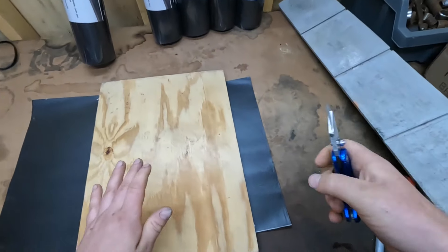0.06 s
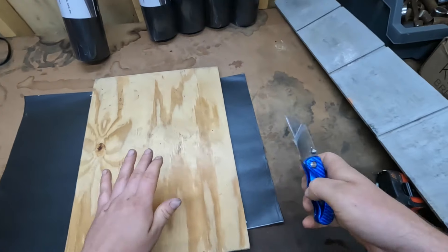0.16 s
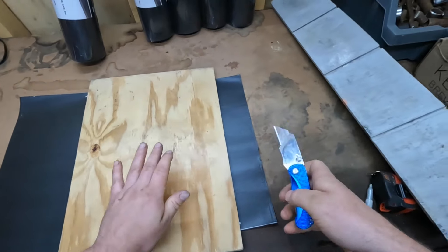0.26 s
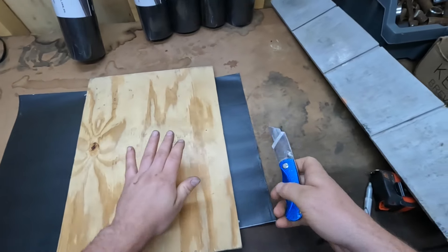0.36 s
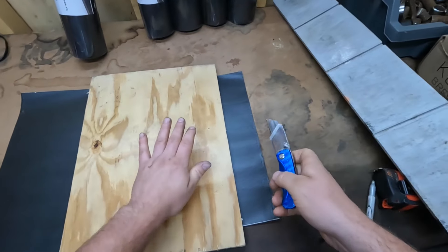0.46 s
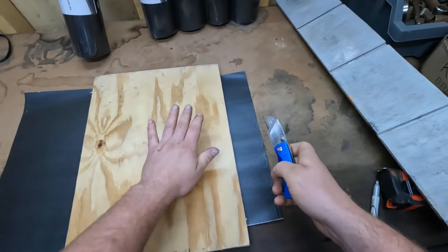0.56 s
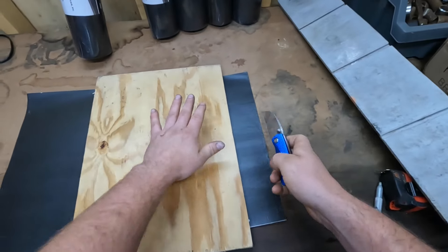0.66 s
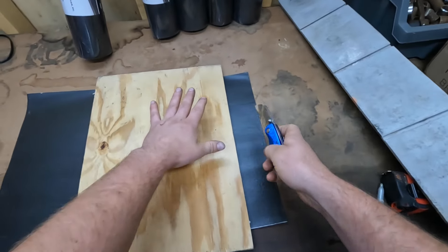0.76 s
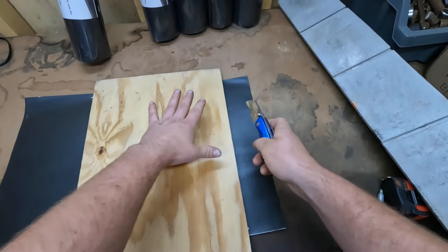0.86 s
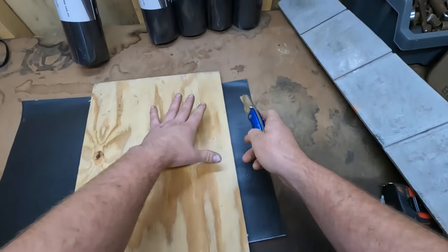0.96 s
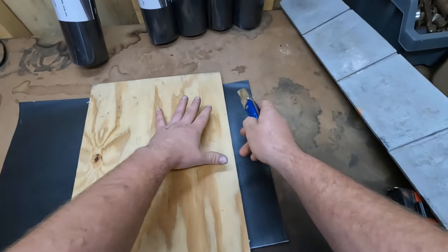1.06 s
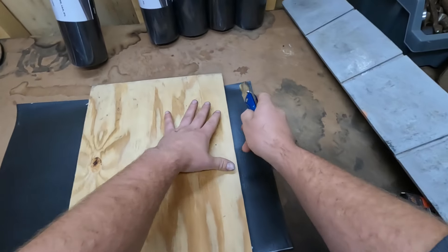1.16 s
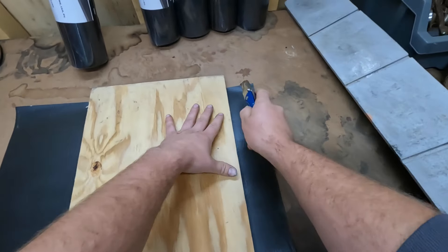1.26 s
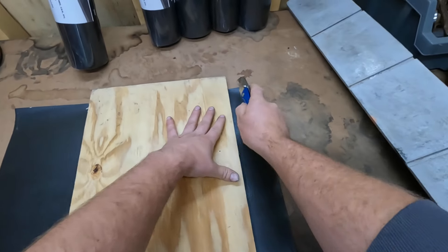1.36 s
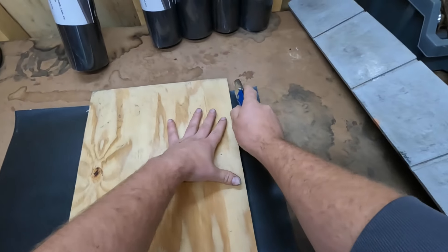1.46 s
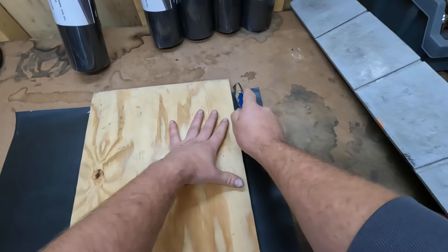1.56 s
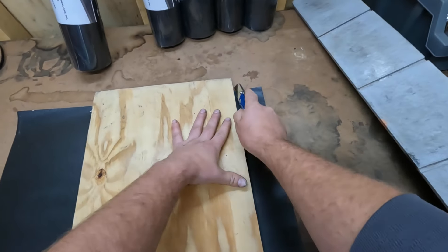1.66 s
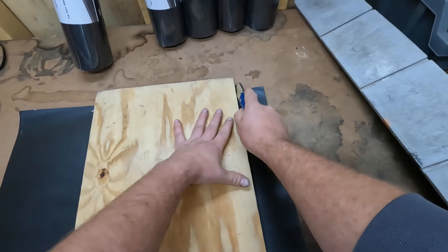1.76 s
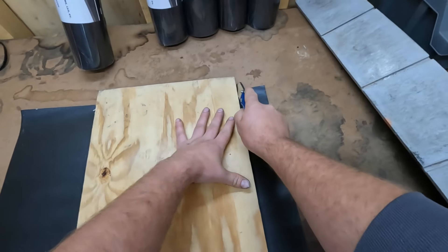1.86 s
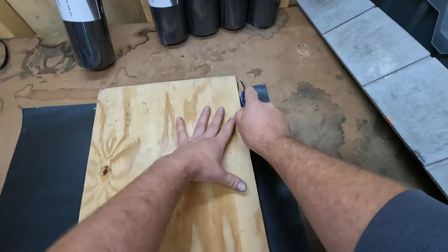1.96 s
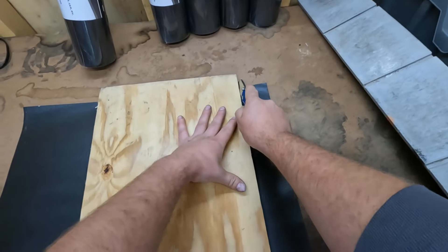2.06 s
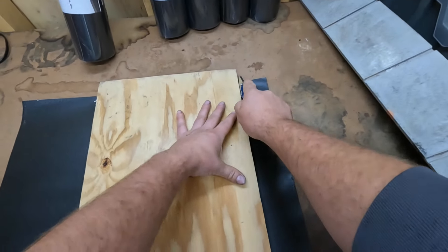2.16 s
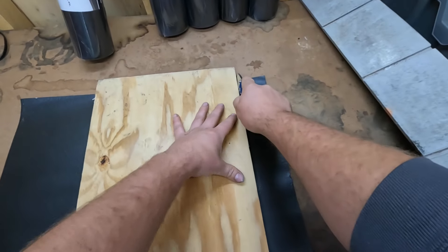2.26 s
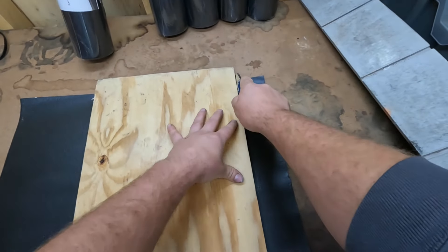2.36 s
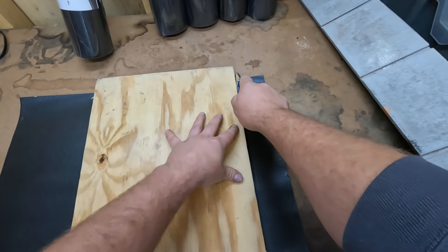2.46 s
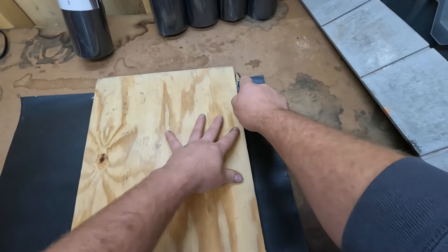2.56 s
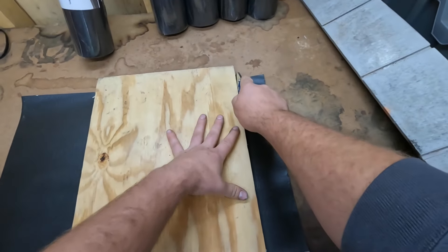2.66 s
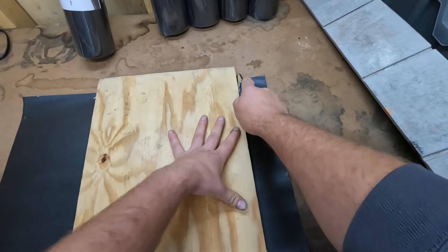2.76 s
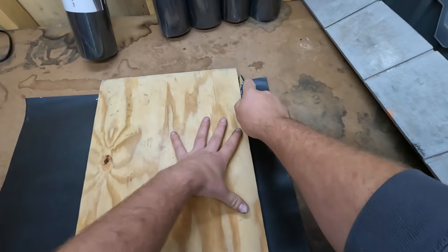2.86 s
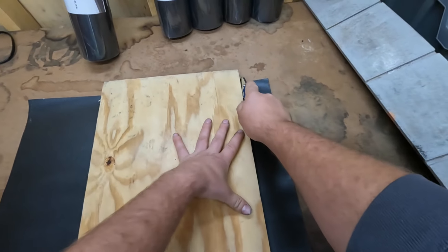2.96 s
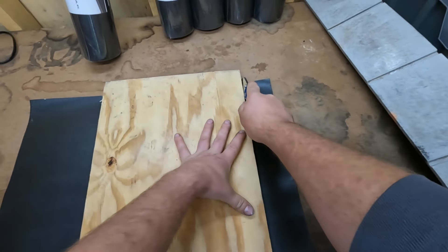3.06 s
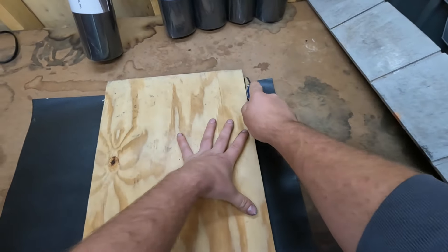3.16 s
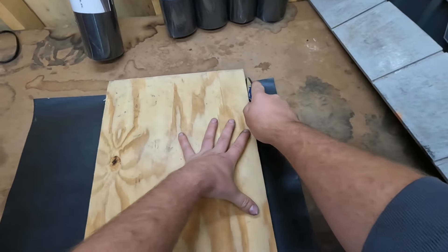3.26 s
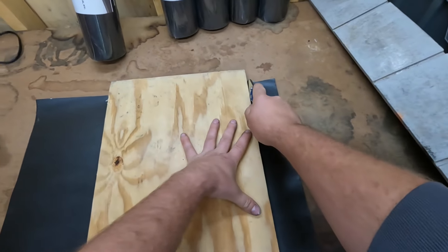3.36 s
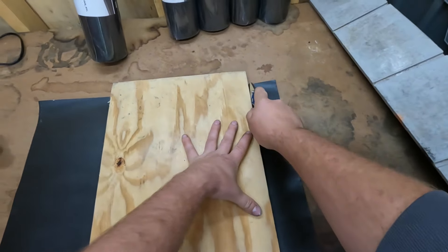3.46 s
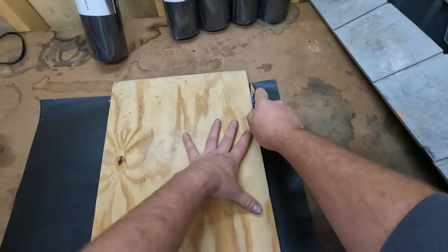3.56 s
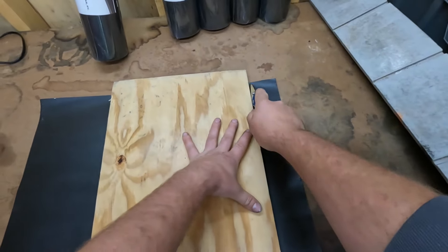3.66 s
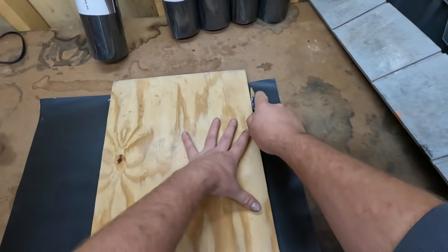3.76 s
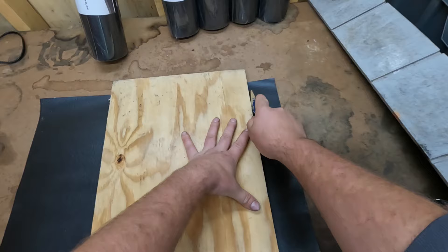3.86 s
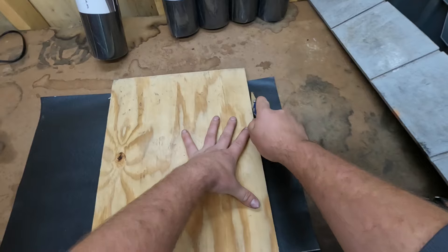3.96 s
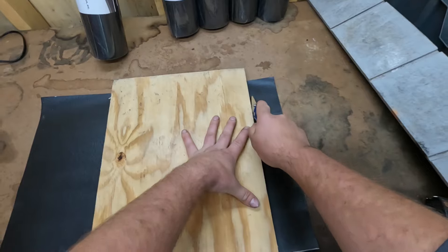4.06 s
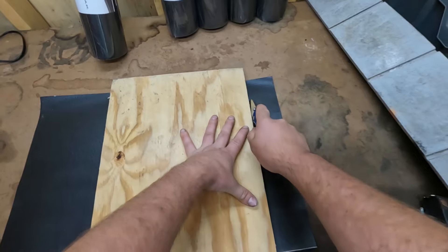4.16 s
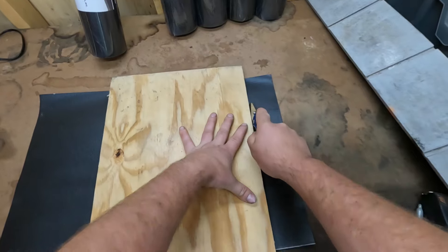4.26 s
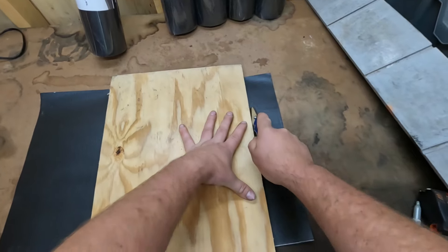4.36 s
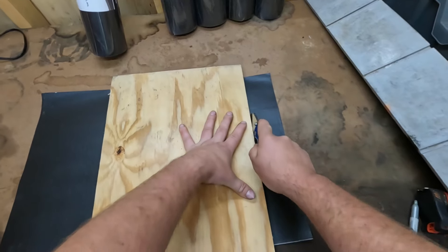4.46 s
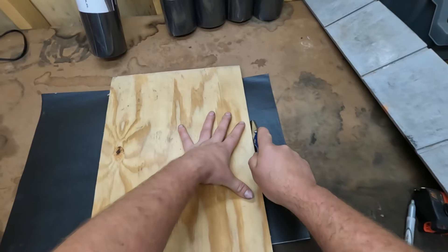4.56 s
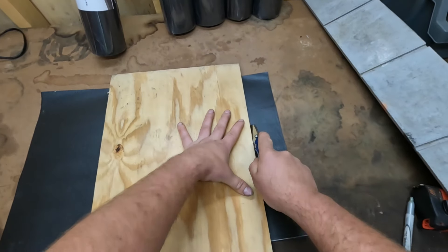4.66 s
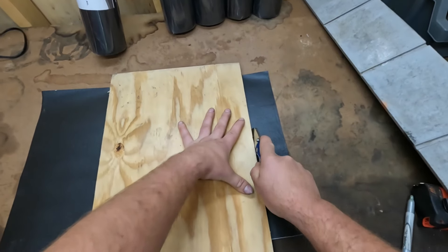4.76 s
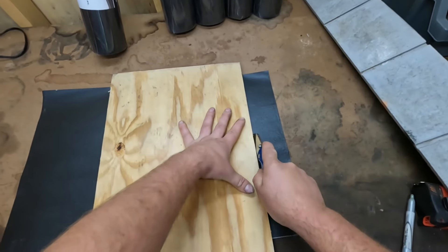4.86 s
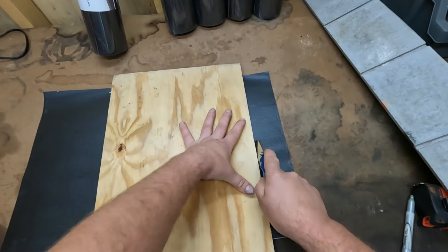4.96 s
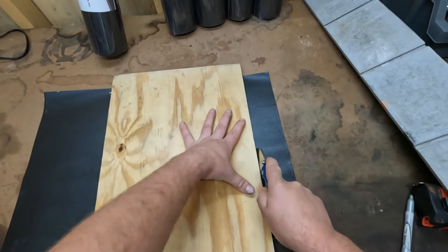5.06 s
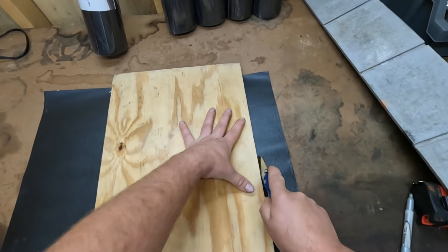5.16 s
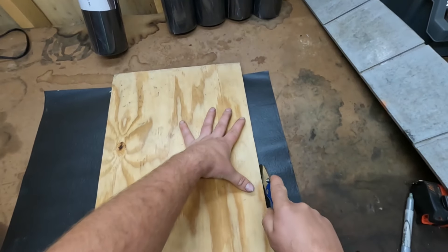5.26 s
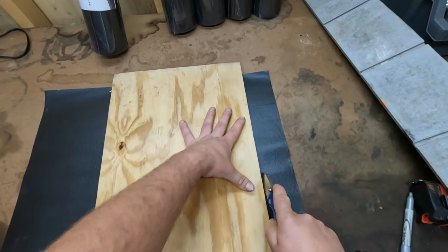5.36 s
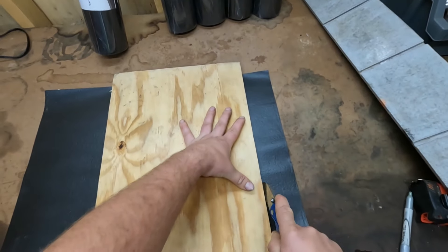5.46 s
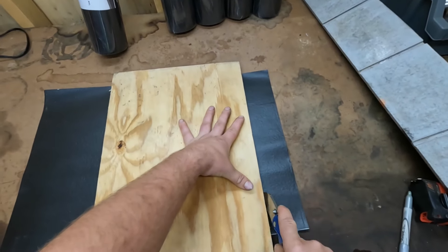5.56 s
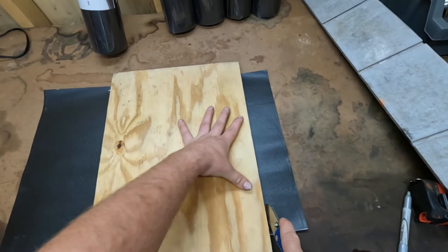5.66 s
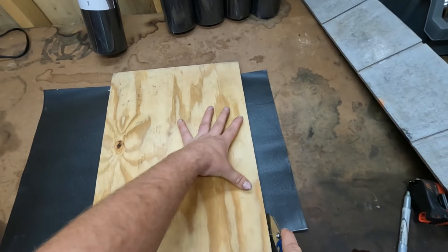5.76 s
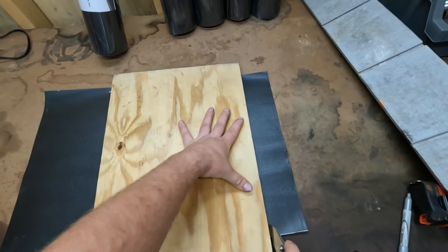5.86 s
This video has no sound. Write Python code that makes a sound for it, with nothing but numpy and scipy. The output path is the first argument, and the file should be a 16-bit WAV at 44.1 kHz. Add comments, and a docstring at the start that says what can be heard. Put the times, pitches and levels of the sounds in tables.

```python
"""A small workshop: a plywood board lies on a rubber mat on a workbench, heard from a camera worn close by.
A palm lands and slides as brushed grain noise; the nudged board scuffs and knocks as ringing modes and dense noise.
Then a utility knife is drawn along its edge: random slips shake the board, rasp on the wood and tear the rubber,
with judder, snaps and faint gliding tones. Short reflections, room air and a low camera rumble surround the work."""
import sys
import numpy as np
from scipy import signal
from scipy.fft import rfft, irfft, next_fast_len
from scipy.io import wavfile

SR = 44100
rng = np.random.default_rng(int(sys.argv[2]) if len(sys.argv) > 2 else 0)


def log_audio(samples):
    """Write samples as a 16-bit WAV file to the path given in sys.argv[1]."""
    # one column per channel
    frames = np.atleast_2d(samples).T
    # limit to full scale, then quantise
    limited = np.clip(frames, -1, 1)
    pcm = np.round(limited * 32767).astype(np.int16)
    wavfile.write(sys.argv[1], SR, pcm)


N = 260190
TIME = np.arange(N) / SR   # s

# Source levels are relative to one another, ahead of the workshop's overall level.
# Tone of the board dragged by the blade: freq_hz, level_db
DRAG_COLOUR = [(50, -8.5), (100, -1), (154, 6.5), (188, 0.5), (212, 5), (240, -0.5), (272, 4), (302, -4),
               (335, 3), (375, -6), (425, -1.5), (480, -8), (540, -8.5), (640, -16), (820, -22),
               (1200, -24.5), (2500, -88.5)]
# Tone of the blade rasping along the wood: freq_hz, level_db
RASP_COLOUR = [(400, -18.5), (660, -2.5), (830, -14), (1020, -1.5), (1350, 2.5), (1800, 0.5), (2400, -0.5),
               (2850, -7.5), (3400, -8.5), (4300, -41), (7000, -40), (16000, -68)]
# Tone of the parting rubber, also of its snaps: freq_hz, level_db
HISS_COLOUR = [(1500, -9), (3000, 2.5), (3700, 0), (4500, -1.5), (5500, -1.5), (6400, -3.5), (7300, -8.5),
               (8200, -11.5), (9500, -17.5), (11200, -12), (12400, -15.5), (13800, -27), (15500, -46)]
TOUCH_S, SETTLE_S = 2.86, 0.12   # the blade meets the edge and settles against it
HISS_FOLLOWS = 0.61   # share of the pull's swing in dB that the parting rubber follows
PASS_S, PASS_WIDTH_S, PASS_DB = 4.764, 0.19, 8.5   # beside the pressing hand the blade shakes the board most


def cut(drag_db=-31.0, board_db=-36.5, rasp_db=-39, hiss_db=-43.5, chatter_db=-49, catch_db=0.5):
    """Coarse slips shake the board, finer ones rasp along its edge, the finest are the rubber parting."""
    pull_db, depth = pull()
    catch = from_db(catch_db * drift(34))   # the blade sticks and frees itself, in all bands at once
    contact = np.clip((TIME - TOUCH_S) / SETTLE_S, 0, 1)
    force = from_db(pull_db) * catch * contact

    beside_hand = from_db(PASS_DB * np.exp(-((TIME - PASS_S) / PASS_WIDTH_S) ** 2 / 2))
    slips = force * beside_hand * grains(per_s=900, spread_db=0.0, clump_db=-0.03)
    thrum = rms_one(coloured(slips, DRAG_COLOUR))
    ring = rms_one(signal.oaconvolve(slips, board_ring(pitch=0.94, damping=20))[:N])
    shake = np.std(slips) * (from_db(drag_db) * thrum + from_db(board_db) * ring)

    scrape = coloured(grains(per_s=2600, spread_db=1.5, clump_db=0.0), RASP_COLOUR)
    rasp = force * judder() * shifting(scrape)

    tearing = from_db(hiss_db) * grains(per_s=7600, spread_db=1.0, clump_db=0.34)
    tearing = tearing + from_db(chatter_db) * chatter()
    tear_level = from_db(HISS_FOLLOWS * pull_db) * depth * catch * np.std(tearing)
    hiss = tear_level * shifting(coloured(tearing, HISS_COLOUR))
    return near_the_end(shake) + from_db(rasp_db) * rasp + hiss


# How hard the knife is pulled along the edge, as the level of its rasp: time_s, level_db
PULL = [(3.1, -75.5), (3.4, -61), (3.56, -45.5), (3.81, -52), (3.87, -44), (4.04, -43.5), (4.28, -44.5),
        (4.38, -39), (4.57, -40), (4.74, -37), (4.82, -45), (4.92, -42), (4.99, -35.5), (5.1, -43.5),
        (5.17, -35.5), (5.24, -39), (5.32, -36), (5.38, -37.5), (5.43, -36.7), (5.52, -37.5), (5.63, -32.5),
        (5.82, -34), (5.9, -36.5)]
FULL_PULL_DB = -38.5   # a firm, steady pull
BITE_S, SINK_S = 3.2, 0.27   # the tip enters the rubber; time constant of its sinking to full depth


def pull():
    """The pull in dB above a firm one, and the blade's depth in the rubber from 0 to 1."""
    level_db = np.interp(TIME, *np.transpose(PULL))
    depth = 1 - np.exp(-np.maximum(TIME - BITE_S, 0) / SINK_S)
    return level_db - FULL_PULL_DB, depth


def judder(rate_hz=60, wander=0.2, depth_db=1.6):
    """The blade flexes and springs back at a wandering rate, a sawtooth in dB that roughens its rasp."""
    turns = np.cumsum(rate_hz * np.exp(wander * drift(20))) / SR
    sawtooth = rms_one(0.5 - turns % 1)
    return rms_one(from_db(depth_db * sawtooth))


def shifting(x, shift_db=1.4, rate_hz=4):
    """The blade's angle wavers, so each narrow band of the scrape swells and fades on its own."""
    size = next_fast_len(N)
    spectrum, hz = rfft(x, size), np.fft.rfftfreq(size, 1 / SR)
    centres = np.geomspace(800, 13000, num=20)   # Hz
    total = 0
    for share in np.eye(len(centres)):
        narrow = irfft(spectrum * np.interp(hz, centres, share), size)[:N]
        total = total + narrow * from_db(shift_db * drift(rate_hz))
    return rms_one(total)


SNAG_T60_S = 0.0094   # decay of each catch and snap


def chatter(per_s=130, jitter=0.28, spread_db=-0.5):
    """Stick and slip: a loosely regular run of sharp catches of uneven size, lesser than the snags."""
    clicks, chance = np.zeros(N), rng.standard_normal((2000, 2))
    gaps_s = np.exp(jitter * chance[:, 0]) / per_s
    at = (np.cumsum(gaps_s) * SR).astype(int)
    sizes = from_db(spread_db * np.minimum(chance[:, 1], 1))
    clicks[at[at < N]] = sizes[at < N]
    envelope = signal.oaconvolve(clicks, dying(TIME[:SR // 50], SNAG_T60_S))[:N]
    return rms_one(envelope * rng.standard_normal(N))


def near_the_end(shake, start_s=4.88, span_s=0.8, low_hz=240, high_hz=1500, loss_db=5, most=0.48):
    """As the blade leaves the pressing hand behind, the drag weakens and loses some of its depth."""
    away = np.clip((TIME - start_s) / span_s, 0, 1)
    share = most * away
    thinner = np.sqrt(1 - share) * shake + np.sqrt(share) * band(shake, low_hz, high_hz)
    return from_db(-loss_db * away) * thinner


# The blade snags in the rubber and snaps free: start_s, level_db
SNAGS = [(3.549, -35.5), (3.565, -41), (3.581, -37.5), (3.622, -45), (3.650, -52), (3.815, -39),
         (3.861, -33), (4.008, -31), (4.644, -38), (4.702, -30.5), (5.189, -31), (5.822, -40)]


def snags():
    """Each release is one very short, bright snap of noise."""
    out, t = np.zeros(N), TIME[:SR // 20]
    for s, db in SNAGS:
        snap = rms_one(coloured(rng.standard_normal(len(t)), HISS_COLOUR))
        add(out, s, from_db(db) * snap * dying(t, SNAG_T60_S))
    return out


# Blade and board edge singing faintly as the knife's angle changes; length is the swell's standard deviation:
# peak_s, length_s, pitch_hz, glide_octaves_per_s, half_width_hz, level_db
SINGS = [(3.37, 0.072, 1289, -0.27, 218, -58), (4.385, 0.088, 1192, 0.42, 288, -41.5),
         (4.412, 0.041, 11000, -0.3, 300, -57.5), (4.62, 0.18, 2177, 0, 500, -41.5),
         (4.69, 0.031, 5680, -0.096, 820, -59), (5.06, 0.14, 6000, -0.33, 260, -59.5),
         (5.185, 0.05, 5790, -0.5, 520, -43), (5.25, 0.15, 3265, 0.18, 340, -47.5),
         (5.43, 0.039, 2250, 0.093, 200, -42), (5.64, 0.074, 1772, 0.35, 160, -36.5),
         (5.632, 0.035, 6400, -0.19, 350, -53), (5.717, 0.075, 4640, -1.1, 400, -45.5),
         (5.742, 0.072, 3640, -0.88, 260, -39.5), (5.8, 0.083, 2152, 1.35, 360, -37.5),
         (5.851, 0.05, 2920, -0.91, 340, -41.5)]


def singing():
    """Friction noise caught in a gliding resonance: narrow noise carried on a sliding pitch."""
    out, t = np.zeros(N), TIME[:SR // 2] - 1 / 4
    for s, length, hz, glide, width_hz, db in SINGS:
        phase = 2 * np.pi * np.cumsum(hz * 2 ** (glide * t)) / SR
        narrow = signal.butter(2, width_hz, fs=SR, output="sos")
        a, b = signal.sosfilt(narrow, rng.standard_normal((2, len(t))))
        tone = rms_one(a * np.cos(phase) + b * np.sin(phase))
        add(out, s - 1 / 4, from_db(db) * np.exp(-(t / length) ** 2 / 2) * tone)
    return out


# Blows on the board; damping is by the hands:
# start_s, level_db, contact_brightness_hz, pitch_factor, damping_db_per_s
BLOWS = [(0.228, -26.5, 340, 1.05, 696), (0.24, -6.5, 343, 1.04, 321), (0.2513, -13.5, 277, 1.12, 898),
         (0.2636, -11, 240, 1.05, 1200), (0.912, -30.5, 240, 1.03, 260), (1.601, -53, 2000, 1.6, 260),
         (1.7223, -24.5, 267, 1.06, 218), (1.761, -35.5, 497, 1.3, 350), (1.8639, -48.5, 3000, 1.4, 900),
         (2.173, -41.5, 2030, 1, 132), (2.224, -18, 3000, 1.1, 2601), (2.2336, -16.5, 2970, 0.71, 601.5),
         (2.2404, 2.5, 3030, 1.03, 36.5), (2.2520, -4.5, 560, 1.0, 280), (2.291, -16, 1100, 1.05, 240),
         (2.348, -21, 600, 1.1, 351), (4.972, -18, 560, 2.13, 600), (4.991, -13, 310, 1.46, 90),
         (5.02, -25, 400, 1.2, 120), (5.038, -22, 450, 1.2, 1100), (5.053, -26, 400, 1.06, 1100)]
# Tone of the dense noise in a knock, strongest in the low middle: freq_hz, level_db
KNOCK_GRAIN = [(100, -17.5), (215, 14.5), (390, 8.5), (550, 1), (780, -11), (950, -3), (1400, -8.5),
               (1900, -23), (4000, -18), (7000, -40), (10000, -38.5), (16000, -53.5)]
HARD_HZ, HARD_LOW_CUT_HZ = 3000, 100   # a corner of the board, this bright, pushes out little below the low cut


def blows(grain_db=-15, grain_t60=0.47, grain_damping=2.2, crack_db=-14, crack_t60=0.056):
    """Ringing modes and dense noise; a soft contact wakes only their lows, a hard one the highs too."""
    out, t = np.zeros(N), TIME[:SR // 2]
    for s, db, contact_hz, pitch, damping in BLOWS:
        grain = from_db(grain_db - damping * grain_damping * t) * dying(t, grain_t60)
        crack = from_db(crack_db) * dying(t, crack_t60)
        dense = rms_one(coloured(rng.standard_normal(len(t)), KNOCK_GRAIN)) * (grain + crack)
        soft = np.tile(signal.butter(2, contact_hz, fs=SR, output="sos"), (2, 1))   # low-pass, applied twice
        low_cut_hz = HARD_LOW_CUT_HZ * np.sqrt(contact_hz / HARD_HZ)
        thin = signal.butter(2, low_cut_hz, "high", fs=SR, output="sos")
        knock = signal.sosfilt(np.vstack([soft, thin]), board_ring(pitch, damping) + dense)
        add(out, s, from_db(db) * knock)
    return out


# Modes of the board on the bench, before each blow's pitch and damping: freq_hz, level_db, t60_s
BOARD = [(57.4, -15, 0.78), (87.6, -23.5, 0.13), (132.8, -15, 0.39), (161.4, -6, 0.23), (177, -18.5, 0.16),
         (208.6, -14.5, 0.08), (231.5, -15.5, 0.19), (259.7, -15, 0.094), (276.2, -22, 0.16),
         (340.1, -16.5, 0.25), (363, -16, 0.11), (432, -18.5, 0.36), (486, -25, 0.24), (537, -26.5, 0.27),
         (604, -32.5, 0.17), (662, -39, 0.28), (770, -33.5, .12), (917, -29.5, 0.068), (984, -30, 0.16),
         (1056, -31.5, 0.22), (1174, -33, 0.17), (1272, -33, 0.22), (1326, -32.5, 0.26)]
FREE_HZ, FREE_WIDTH_HZ, FREE_SHARE = 160, 14, 0.16   # main bending mode, and its share of a hand's damping


def board_ring(pitch, damping):
    """The modes after one push, all starting together; the hands damp the main bending mode least."""
    t = TIME[:SR // 2]
    ring = np.zeros(len(t))
    for hz, db, t60 in BOARD:
        held = 1 - (1 - FREE_SHARE) * np.exp(-((hz - FREE_HZ) / FREE_WIDTH_HZ) ** 2)
        level = from_db(db - damping * held * t) * dying(t, t60)
        ring -= level * np.sin(2 * np.pi * hz * pitch * t)
    return ring


# Skin and wood scuffing; band() keeps the low edge an octave or more below the high one:
# peak_s, level_db, rise_s, fall_s, low_hz, high_hz
SCUFFS = [(0.244, -53, 0.0138, 0.02, 700, 1460), (0.269, -52.5, 0.029, 0.03, 700, 1800),
          (0.14, -77, 0.03, 0.03, 1400, 1900), (0.70, -66, 0.11, 0.45, 1200, 1930),
          (1.696, -60, 0.02, 0.048, 2770, 4240), (1.719, -43.5, 0.03, 0.014, 1400, 9500),
          (1.719, -57, 0.018, 0.015, 1690, 3700), (1.74, -51.5, 0.03, 0.059, 790, 3450),
          (1.87, -54, .005, 0.043, 905, 3600), (1.95, -62.5, .03, 0.05, 1000, 3500),
          (2.2238, -25.5, 0.0062, 0.028, 710, 8500), (2.24, -31, 0.035, 0.011, 705, 6500),
          (2.755, -41, 0.012, 0.024, 3040, 10900), (2.797, -52.5, 0.076, 0.076, 2060, 8900),
          (2.842, -68, .012, 0.042, 3000, 9000)]
# Tone of the scuffs: freq_hz, level_db
SCUFF_COLOUR = [(200, 4.5), (450, 1.5), (800, 4), (1100, 4), (1700, 0.5), (2400, 0.5), (2900, -3),
                (3450, 2.5), (4300, -6.5), (6200, -8), (7500, -16), (9500, -20), (11500, -16),
                (15500, -33.5)]


def scuffs():
    """Short slides of friction grain, each with its own band, changing by 20 dB per rise or fall time."""
    friction = coloured(grains(per_s=4300, spread_db=-1.0, clump_db=2), SCUFF_COLOUR)
    out = np.zeros(N)
    for s, db, rise, fall, low, high in SCUFFS:
        drop_db = 20 * np.maximum((s - TIME) / rise, (TIME - s) / fall)
        out += from_db(db - drop_db) * rms_one(band(friction, low, high))
    return out


# Small clicks of knife and wood, and the bright crack of the board's knock: start_s, level_db, ring_hz
TICKS = [(1.198, -47, 5500), (1.247, -60, 9050), (1.270, -54, 8900), (1.503, -48, 3440), (1.602, -52, 2000),
         (1.615, -59, 8200), (1.712, -53, 11500), (1.718, -44, 2900), (1.724, -55, 3880),
         (1.864, -41, 2400), (1.867, -60, 5570), (1.9735, -61, 10600), (2.176, -42, 2640),
         (2.2234, -34.5, 9000), (2.24, -19, 1316), (2.241, -32.5, 7040), (2.243, -23.5, 1890),
         (2.752, -51, 5900), (2.7567, -38, 3360), (2.762, -37, 3630)]


def ticks(crack_t60=0.011, ring_t60=0.046, ring_db=-13, crack_db=-4, spread=1.5):
    """A brief crack of noise around the pitch of the struck part, and its short ring."""
    out, t = np.zeros(N), TIME[:SR // 10]
    for s, db, hz in TICKS:
        crack = rms_one(band(rng.standard_normal(len(t)), hz / spread, hz * spread)) * dying(t, crack_t60)
        ring = np.sin(2 * np.pi * hz * t) * dying(t, ring_t60)
        add(out, s, from_db(db) * (from_db(crack_db) * crack + from_db(ring_db) * ring))
    return out


# Slides of the palm over the plywood: full_speed_s, length_s, level_db
SLIDES = [(0.85, 0.68, -66.5), (1.4, 0.39, -69.5), (2.1, 0.35, -67), (2.46, 0.47, -53.5),
          (2.84, 0.29, -64.5)]
# Tone of skin on plywood: freq_hz, level_db
PALM_COLOUR = [(350, -41.5), (600, -7), (902, -8), (1010, -2.5), (1430, 1.5), (1860, 0), (3470, -2),
               (3870, -5), (7540, -11.5), (9120, -25.5), (11200, -18), (15500, -49.5)]


def palm():
    """Skin brushing over the wood grain: dense tiny slips, louder with the hand's speed."""
    brushing = coloured(grains(per_s=21000, spread_db=4.5, clump_db=0.7), PALM_COLOUR)
    return gestures(SLIDES) * rms_one(brushing)


# Tone of the reflections against the direct sound: freq_hz, level_db
ROOM_COLOUR = [(60, -22), (170, -20), (400, -13), (900, -4), (4000, -3), (9000, -4), (15000, -6)]


def workshop(dry, level_db=-2.5, side_db=-3):
    """The direct sound and the reflections from bench and walls."""
    mid = dry + coloured(reflections(dry), ROOM_COLOUR)
    side = from_db(side_db) * reflections(dry)
    return from_db(level_db) * two_ports(mid, side)


def reflections(dry, move_s=0.13):
    """Hands and camera move, so each pattern of reflections fades into a new one after move_s."""
    step = int(move_s * SR)
    out, fade = np.zeros(N), np.sin(np.pi * np.arange(2 * step) / (2 * step))
    for start in range(0, N, step):
        part = dry[start:start + 2 * step]
        add(out, start / SR, signal.fftconvolve(part * fade[:len(part)], room_tail()))
    return out


# Reverberation time of the workshop: freq_hz, t60_s
ROOM_T60 = [(200, 0.37), (1200, 0.12), (4000, 0.17), (12000, 0.25)]


def room_tail():
    """Dense reflections of unit energy, built from noise bands that each die at their own rate."""
    t, edges, tail = TIME[:SR // 2], np.geomspace(40, SR * 3 / 8, num=10), 0
    for low, high in zip(edges, edges[1:]):
        sos = signal.butter(2, [low, high], "band", fs=SR, output="sos")
        noise = signal.sosfilt(sos, rng.standard_normal(len(t)))
        tail = tail + noise * dying(t, at_hz(ROOM_T60, np.sqrt(low * high)))
    tail = tail * np.clip(t / 0.0013, 0, 1)   # short fade-in
    return tail / np.linalg.norm(tail)


# Gain of the side signal, the two microphone ports' unlike share: freq_hz, gain_db
WIDTH = [(60, -17), (170, -27), (400, -21), (800, -10.5), (1500, -8), (3000, -5.5), (6000, -5),
         (8500, -2.5), (11000, 0.5)]


def two_ports(mid, side):
    """Two close microphones agree in the bass and part in the treble."""
    return mid + coloured(side, WIDTH) * np.array([[1], [-1]])


# Tone of the camera's rumble: freq_hz, level_db
SWAY_COLOUR = [(10, -6), (18, 0), (35, -2), (52, -3.5), (75, -10), (105, -15.5), (150, -22.5), (220, -43.5),
               (400, -71)]
# Low rumble of the camera, swayed by arm movements and jolted by the knock: peak_s, length_s, rumble_level_db
REACHES = [(0.95, 0.22, -37), (1.44, 0.52, -36.5), (2.27, 0.18, -33.5), (2.83, 0.35, -41), (4.45, 2.3, -32),
           (5.16, 0.22, -36.5), (5.68, 0.69, -34)]
# Tone of the still room air: freq_hz, level_db
AIR = [(20, 2), (90, -16), (160, 0), (220, -7), (320, -19.5), (500, -24.5), (800, -33), (1300, -27.5),
       (2500, -37), (4000, -40.5), (6000, -37.5), (9500, -48), (12000, -49), (15500, -67)]


def background(air_db=-56.5, still_sway_db=-44.5):
    """Still room air, and the low rumble of the camera, swayed by arm movements and jolted by the knock."""
    sway = np.hypot(from_db(still_sway_db), gestures(REACHES))
    layers = []
    for _ in range(2):   # mid and side
        air = from_db(air_db) * rms_one(coloured(rng.standard_normal(N), AIR))
        rumble = sway * rms_one(coloured(rng.standard_normal(N), SWAY_COLOUR))
        layers.append(air + rumble)
    return two_ports(*layers)


def gestures(rows):
    """Each row swells and falls in one smooth arch."""
    out = np.zeros(N)
    for s, length, db in rows:
        out += from_db(db) * np.cos(np.pi * np.clip((TIME - s) / length, -0.5, 0.5))
    return out


def grains(per_s, spread_db, clump_db):
    """Friction: tiny slips at random moments, of uneven size, coming in clumps."""
    sizes = from_db(spread_db * np.minimum(rng.exponential(1, N), 4) + clump_db * drift(10))
    slips = rng.random(N) < per_s / SR
    return rms_one(sizes * rng.choice([-1, 1], N) * slips)


def drift(rate_hz):
    """Slow chance of RMS 1: noise through two equal low-passes, computed at every 20th sample."""
    r = np.exp(-40 * np.pi * rate_hz / SR)
    slow = signal.lfilter([1], [1, -2 * r, r * r], rng.standard_normal(N // 20 + 2002))[2000:]
    return np.interp(np.arange(N) / 20, np.arange(len(slow)), rms_one(slow))


def coloured(x, spectrum):
    """Causal (minimum-phase) filter with the given dB spectrum."""
    size = 8192
    hz = np.arange(size // 2 + 1) * SR / size
    cepstrum = irfft(np.log(from_db(at_hz(spectrum, hz))))
    cepstrum[1:size // 2] *= 2   # folding the cepstrum makes the filter causal
    cepstrum[size // 2 + 1:] = 0
    impulse = irfft(np.exp(rfft(cepstrum)))[:size // 2]
    return signal.oaconvolve(x, impulse)[:len(x)]


def band(x, low_hz, high_hz):
    """Band-pass at least an octave wide, with its top kept in range."""
    high = min(high_hz, SR * 3 / 8)
    sos = signal.butter(2, [min(low_hz, high / 2), high], "band", fs=SR, output="sos")
    return signal.sosfilt(sos, x)


def at_hz(points, hz):
    """Read a table on a log-frequency axis."""
    f, value = np.transpose(points)
    return np.interp(np.log(np.maximum(hz, 1)), np.log(f), value)


def from_db(db):
    """Decibels to amplitude."""
    return 10 ** (np.asarray(db) / 20)


def rms_one(x):
    """Scale to an RMS of 1."""
    return x / np.sqrt(np.mean(x ** 2) + 1e-20)


def dying(t, t60):
    """Exponential decay by 60 dB in t60 seconds."""
    return from_db(-60 * t / t60)


def add(track, s, sound):
    """Mix a short sound in at time s."""
    start = int(round(s * SR))
    track[start:start + len(sound)] += sound[:N - start]


# Phase by which the left port leads the right: freq_hz, lead_rad
PORT_PHASE = [(100, 0.043), (250, -0.24), (690, -0.48), (2700, -0.55), (6700, -0.41), (9000, -1.48),
              (10500, -0.22), (12000, 0.048), (15000, .1)]


def scene(pan_db=0.38):
    """The work reaches the two microphone ports slightly out of step, over the background."""
    work = cut() + snags() + singing() + blows() + scuffs() + ticks() + palm()
    left, right = workshop(work)
    size = next_fast_len(N + SR // 10)
    turn = np.exp(1j * at_hz(PORT_PHASE, np.fft.rfftfreq(size, 1 / SR)) / 2)   # half the lead to each port
    ports = irfft(rfft([left, right], size) * np.array([turn, 1 / turn]), size)[:, :N]
    return ports * from_db([[pan_db], [-pan_db]]) + background()


def record(dry, cutoff_hz=15700):
    """The highest peaks are rounded, the top is cut."""
    rounded = dry / (1 + dry ** 6) ** (1 / 6)
    return signal.sosfilt(signal.ellip(10, 0.1, 80, cutoff_hz, fs=SR, output="sos"), rounded)


dry = scene()
out = record(dry)
log_audio(out)
```